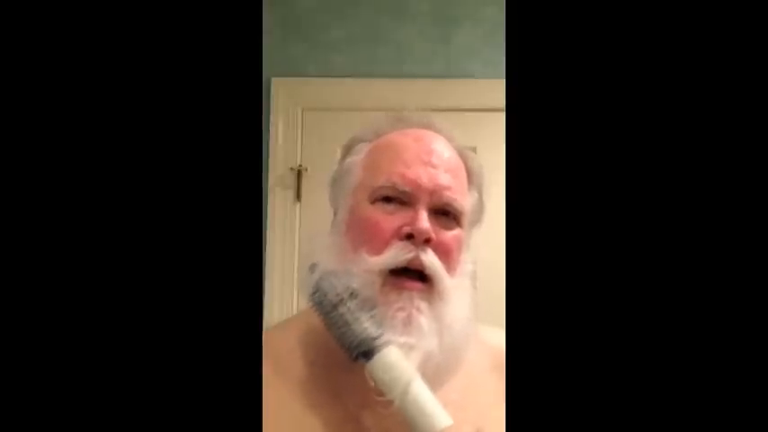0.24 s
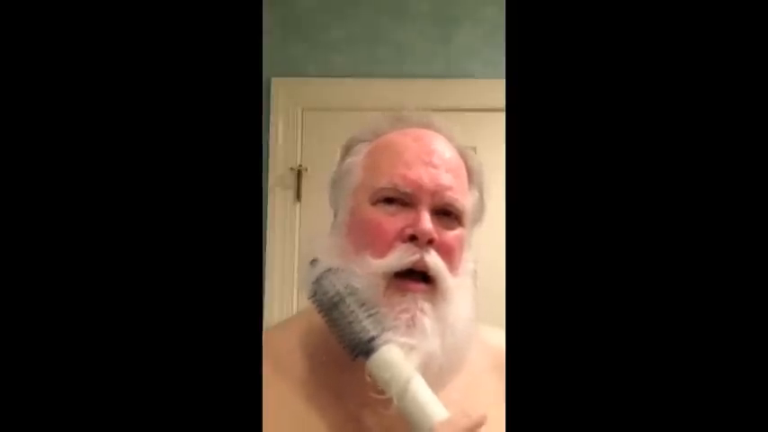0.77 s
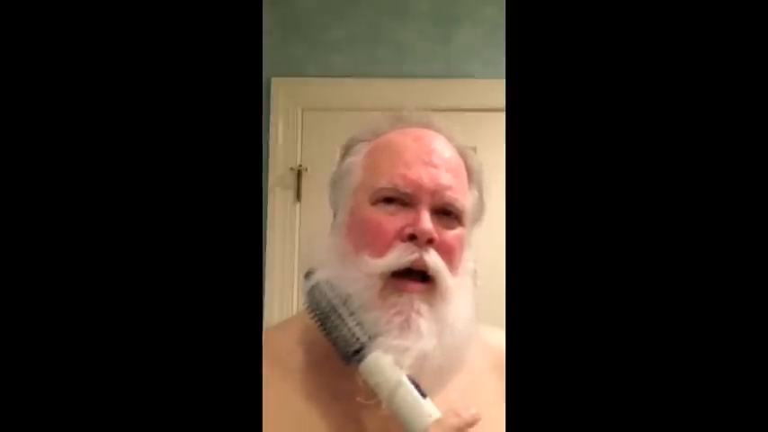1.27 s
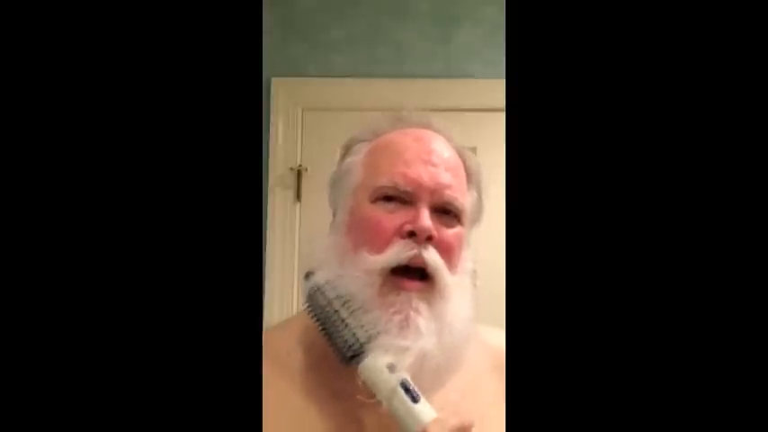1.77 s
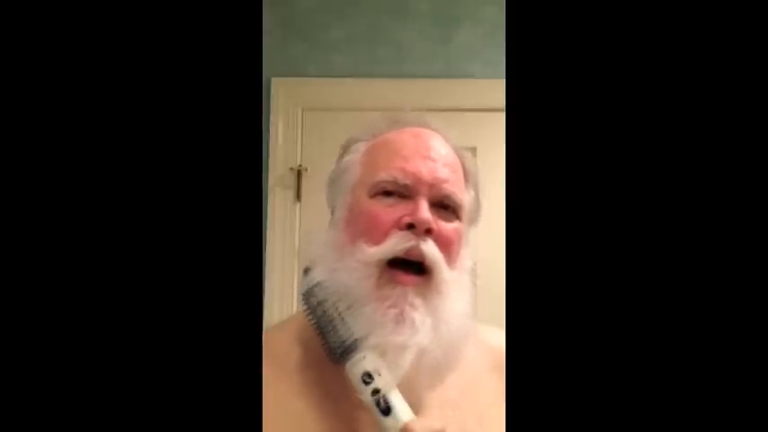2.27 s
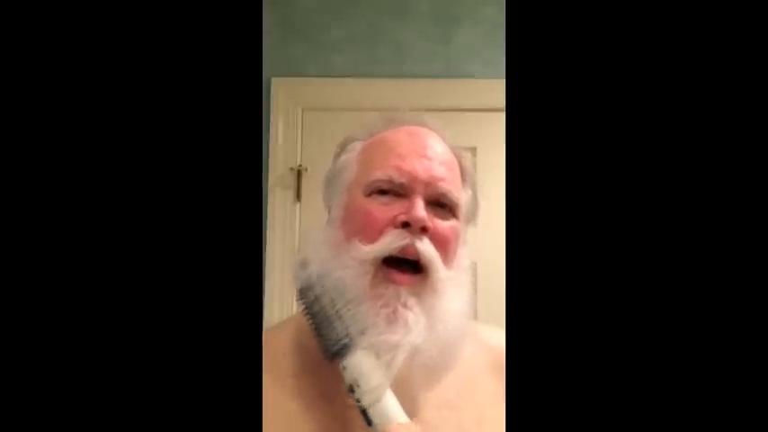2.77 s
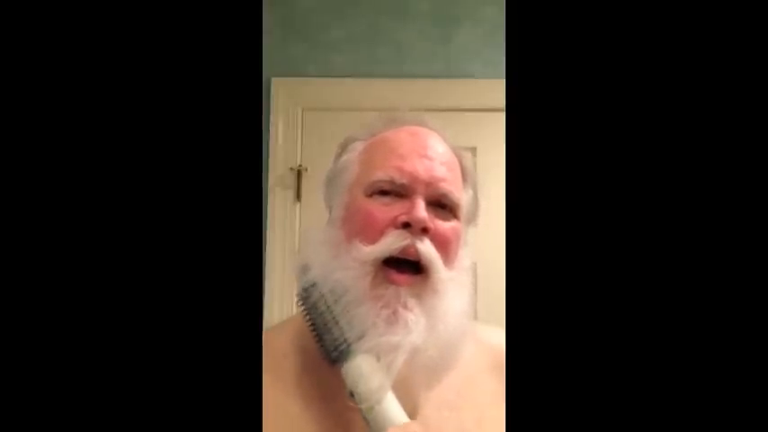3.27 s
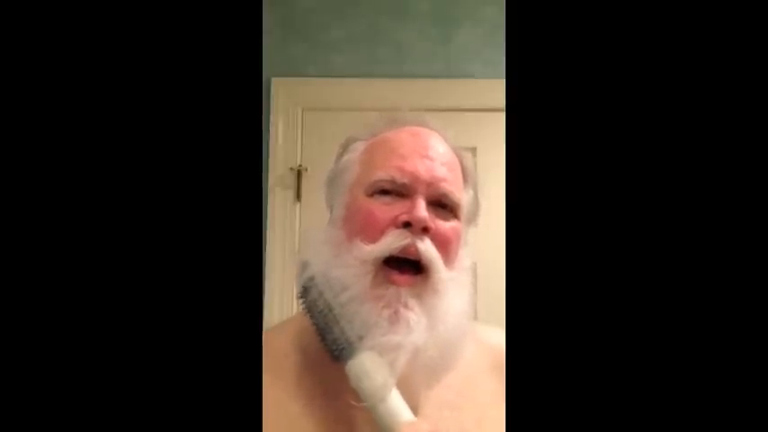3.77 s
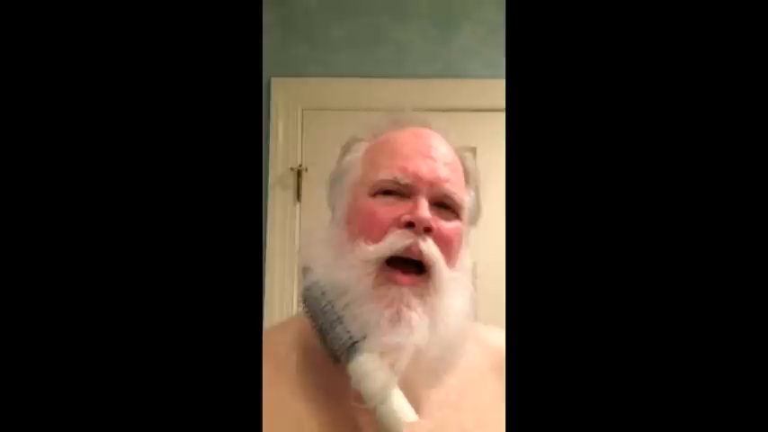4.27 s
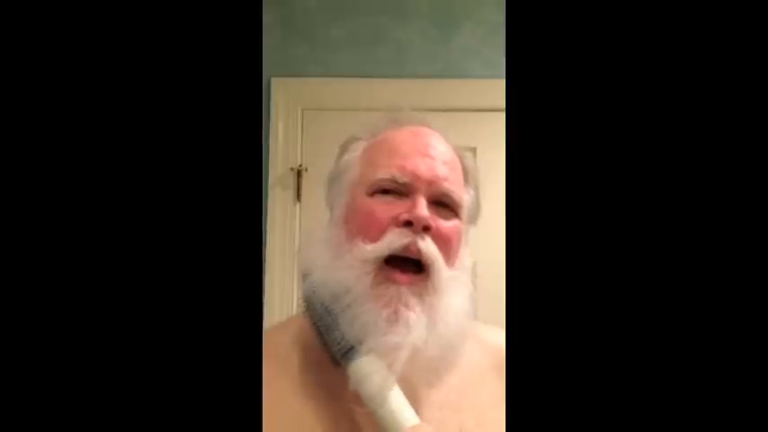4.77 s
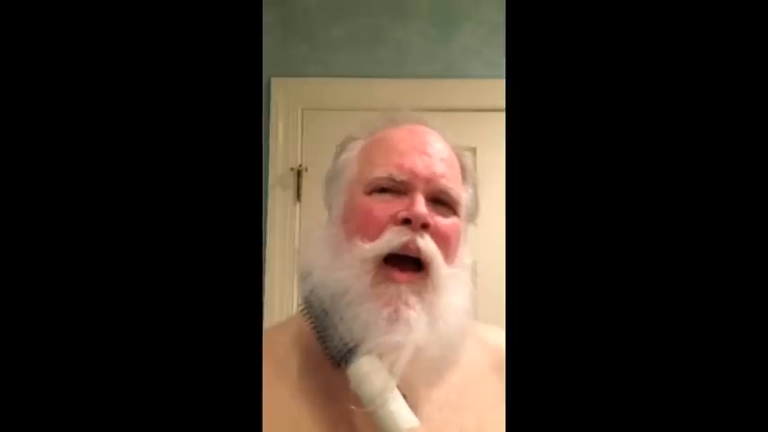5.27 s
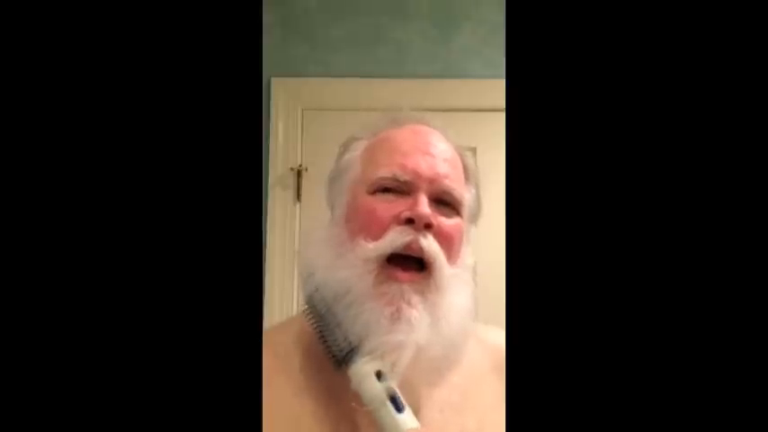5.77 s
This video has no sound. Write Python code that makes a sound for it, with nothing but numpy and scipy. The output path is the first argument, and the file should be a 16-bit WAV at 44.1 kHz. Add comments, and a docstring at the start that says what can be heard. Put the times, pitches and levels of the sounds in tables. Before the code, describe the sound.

Steady blowing air, mostly hiss with a hollow mid roar, and the high electric whine of a small fast fan, heard very close with a short bathroom reverberation. The motor pitch barely moves, but individual tones flicker in and out as the brush turns through hair. The rush is slightly duller around one to two seconds, then opens brighter and fuller, running on to the end.

```python
"""Hot-air brush in a beard

Small bathroom, hard walls: a hot-air styling brush, close to the microphone, is drawn slowly through a beard.
Air rushes out through the barrel: coloured noise in six registers, with a short room tail.
It rings briefly in gaps against the hair: noise through narrow resonances, faded in and out.
The fan motor whines in a stack of shaft orders, each flanked by side tones from the rectified mains.
As the brush turns, the rush changes colour and single tones swell and fade.
"""
import sys
import numpy as np
from scipy import signal
from scipy.fft import rfft, irfft, next_fast_len
from scipy.io import wavfile
from scipy.ndimage import uniform_filter1d, map_coordinates

SR = 44100
rng = np.random.default_rng(int(sys.argv[2]) if len(sys.argv) > 2 else 0)


def store_wav(level_fs):
    """Save 16-bit WAV to argv[1]."""
    pcm = np.round(np.clip(np.atleast_2d(level_fs), -1, 1) * 32767)
    wavfile.write(sys.argv[1], SR, pcm.T.astype(np.int16))


N = 265482

# decay of the bathroom tail: pitch_hz, t60_s
BATHROOM_DECAY = [(150, 0.35), (2000, 0.29), (12000, 0.098)]
# how squarely the air outlets face the microphone: time_s, facing (0 turned away to 1 facing)
OUTLET_FACING = [(0, 0.49), (.9, 0.042), (1.8, .03), (2.3, 0.68), (2.7, 0.36), (3.5, 0.88), (4.7, 0.74),
                 (5.7, 0.43), (6, 0.71)]
# broad spectrum of the rushing air, before each register is levelled: pitch_hz, density_db (per Hz, relative)
AIR_SPECTRUM = [(25, -46), (52, -47), (68, -26), (100, -27.5), (120, -16.5), (300, -13.5), (430, -9),
                (560, -4), (850, -1), (2300, 1), (3100, -6), (4300, -4.5), (7800, -11), (10000, -17),
                (15200, -25)]
# resonances the air excites in room and barrel: pitch_hz, width_hz, lift_db (negative for a dip)
HOLLOW_RESONANCES = [(119.3, 9.7, 5.5), (142, 8.2, 9.5), (219.5, 23, 5), (338, 35, 4), (454, 8.2, -1),
                     (519, 5.5, 8), (590.5, 12.7, 8.5), (633, 11, 2), (687, 8, 3), (704, 17, -10),
                     (880, 57, 7.5), (974, 41, -3), (1340, 26, -4), (1404, 15, 3.5), (1700, 92, 4.5),
                     (1835, 40, -2), (2110, 35, -2), (2504, 67, 4.5), (3590, 94, 4), (5400, 570, -3)]
# brief resonances of the air between barrel and beard: start_s, end_s, pitch_hz, width_hz, level_db (rms)
GAP_RINGS = [ (-.1, 1.4, 480, 60, -52), (.85, 2.6, 1400, 260, -47), (1.05, 1.3, 2480, 200, -43.5),
             (2.12, 2.5, 2430, 300, -42.5), (2.3, 2.47, 860, 110, -41), (2.55, 3.2, 2626, 200, -46),
             (2.6, 3.7, 1730, 160, -46), (3.3, 3.75, 850, 200, -43), (3.52, 3.7, 1400, 160, -44),
             (3.85, 4.08, 5560, 1100, -40), (4.03, 4.36, 824, 180, -44), (4.1, 5.5, 2470, 280.6, -45.5),
             (4.38, 4.7, 1050, 160, -43), (4.7, 5, 573, 69.95, -48.5), (4.902, 6.1, 882, 50.3, -47.5),
             (5.52, 5.54, 2000, 799, -39)]
# fan shaft speed, sagging slightly under load: time_s, speed_hz (turns per second)
SHAFT_SPEED = [(0, 378.0), (0.85, 377.1), (1.25, 377.9), (2.25, 379.2), (2.75, 378.3), (3.9, 378.5),
               (5.45, 377.6), (5.8, 378.3), (6.02, 379.5)]
# shaft whine at orders that are no multiple of three, before the resting trim: pitch_hz, level_db (rms)
SHAFT_WHINE = [(380, -61), (760, -52.5), (1500, -51.5), (2270, -51), (2650, -51), (4500, -56), (8700, -55),
               (11000, -61.5), (12000, -63), (15000, -67)]
# commutator whine at every third order, before the resting trim: pitch_hz, level_db (rms)
COMMUTATOR_WHINE = [(1130, -50.5), (3400, -51), (4540, -50.5), (5670, -55.5), (6800, -50), (7940, -50.5),
                    (9080, -50), (10200, -69), (11350, -55.5), (12480, -60), (13600, -60), (15000, -66)]
# mains side tones that beat hardest and steadily: order (of the shaft), side (-1 or 1), level_db (rms)
MAINS_BEATS = [(3, -1, -57), (3, 1, -53), (6, -1, -52), (6, 1, -52.5)]
# tones that stand out while the brush points their way:
# start_s, end_s, order (of the shaft), side (-1, 0 or 1 ripple), level_db (rms, gate fully open)
AIMED_SWELLS = [ (-.1, .24, 5, 0, -37), (-.1, 0.14, 24, 0, -43.5), (-.1, .36, 21, 0, -44),
                (-.1, 1.2, 3, -1, -47.3), (.06, .15, 12, 0, -39.5), (.1, .55, 3, 1, -46.5),
                (.19, 0.34, 12, 0, -38.5), (.19, 1.68, 33, 0, -54), (.23, .57, 18, 0, -45.5),
                (.24, .42, 5, 0, -37.5), (.38, 0.53, 24, 0, -44), (.42, 0.54, 5, 0, -42.5),
                (.43, .53, 2, 0, -43.5), (.55, 0.71, 5, 0, -39.5), (.55, 0.76, 10, 0, -48),
                (.58, 0.84, 12, 0, -42), (.63, .88, 24, 0, -39.5), (.77, .88, 5, 0, -40),
                (.88, 4.3, 3, 1, -45), (.85, 1.35, 4, 0, -47.5), (.95, 1.3, 18, 0, -47),
                (1.05, 1.24, 10, 0, -45.5), (1.34, 1.7, 12, 0, -42.5), (1.47, 1.66, 10, 0, -44),
                (1.5, 1.65, 24, 0, -46), (1.5, 1.6, 8, -1, -47.5), (1.6, 3, 1, 0, -55.5),
                (1.72, 2.08, 5, 0, -45), (1.79, 1.96, 6, -1, -38.5), (1.8, 1.9, 4, 0, -44),
                (1.95, 2, 21, 0, -42), (1.98, 2.2, 12, 0, -43), (2.05, 2.3, 9, 0, -46),
                (2.05, 2.15, 24, 0, -41.5), (2.12, 2.23, 6, -1, -42.5), (2.15, 2.8, 3, -1, -48),
                (2.2, 2.2, 21, 0, -45), (2.21, 2.35, 2, 0, -40.5), (2.22, 2.4, 24, 0, -47),
                (2.28, 2.5, 6, -1, -35.7), (2.28, 2.55, 4, 0, -45.3), (2.38, 2.54, 21, 0, -42.3),
                (2.45, 2.68, 2, 0, -40), (2.68, 3.27, 2, 0, -41.3), (2.5, 3.3, 3, 0, -46.5),
                (2.65, 3.04, 6, -1, -43.5), (2.65, 3.25, 18, 0, -48), (2.71, 2.74, 24, 0, -40.5),
                (2.72, 3, 10, 0, -43), (2.72, 3.15, 4, 1, -45), (2.88, 3.1, 11, 0, -45),
                (3, 3.65, 10, 0, -46.5), (3, 3.22, 24, 0, -45), (3.05, 3.33, 3, 0, -43.5),
                (3.1, 3.9, 5, 1, -48), (3.15, 3.23, 6, -1, -36), (3.2, 4.1, 15, 0, -48.5),
                (3.22, 3.64, 4, 1, -42), (3.331, 3.48, 21, 0, -43), (3.34, 3.64, 2, 0, -39.5),
                (3.54, 3.67, 2, 0, -42.5), (3.38, 3.66, 6, -1, -40.7), (3.43, 3.4, 4, 0, -43.7),
                (3.57, 3.96, 9, 0, -42), (3.66, 3.78, 24, 0, -43), (3.68, 4.2, 4, 1, -46),
                (3.72, 3.92, 8, -1, -47), (3.84, 4.14, 6, -1, -42.5), (3.85, 4.5, 6, 1, -45),
                (3.89, 4.17, 24, 0, -44), (3.97, 4.6, 2, 0, -46), (4.03, 5.6, 3, -1, -44.5),
                (4.15, 4.5, 9, 0, -44), (4.17, 4.29, 24, 0, -39.5), (4.2, 4.6, 5, 0, -44.5),
                (4.2, 5.9, 21, 0, -49), (4.31, 4.7, 12, 0, -41.5), (4.31, 4.6, 33, 0, -55),
                (4.35, 4.72, 3, 0, -44), (4.38, 4.66, 9, 0, -43.3), (4.5, 6.6, 3, 1, -45.5),
                (4.75, 4.96, 10, 0, -44.5), (4.8, 4.92, 4, 0, -41.5), (4.88, 5.1, 2, 0, -48),
                (4.88, 5.1, 9, 0, -44.5), (4.9, 4.9, 24, 0, -45.5), (4.95, 5.1, 15, 0, -47.5),
                (5.07, 5.1, 10, 0, -41.5), (5.27, 6.8, 10, 1, -49.5), (5.29, 5.5, 10, 0, -43),
                (5.34, 5.4, 24, 0, -44), (5.379, 5.56, 15, 0, -46.5), (5.55, 6.1, 5, 0, -48),
                (5.7, 6.1, 11, 0, -45), (5.76, 6, 6, -1, -41.3), (5.79, 6.2, 24, 0, -43.5)]

RIPPLE_HZ = 120  # rectified mains
SEGMENTS, BLADES, ORDER_COUNT = 3, 5, 40
BLADE_DB, BLADE_OCTAVE_DB = -49.5, -53  # rms, before the resting trim
TOP_HZ = 15300  # upper limit of the microphone


def amp(db):
    """Decibels to gain."""
    return 10 ** (np.asarray(db) / 20)


def unit(x):
    """Scale to rms 1."""
    return x / np.sqrt(np.mean(np.abs(x) ** 2) + 1e-20)


def along(points, hz):
    """Read (pitch_hz, value) points on a log pitch axis."""
    point_hz, values = np.transpose(points)
    return np.interp(np.log(hz + 1), np.log(point_hz + 1), values)


def over_time(points):
    """Read (time_s, value) points at every sample."""
    time_s, values = np.transpose(points)
    return np.interp(np.arange(N) / SR, time_s, values)


def wobble(rate_hz):
    """A smooth random curve through rate_hz random knots a second."""
    coarse = np.linspace(0, N, num=2048)
    knots = rng.standard_normal(size=1024)
    curve = map_coordinates(knots, [coarse * rate_hz / SR], mode="mirror")
    return np.interp(np.arange(N), coarse, curve)


def filtered(x, response):
    """Multiply the spectrum of x by a response of frequency."""
    size = next_fast_len(N + SR // 2)
    spectrum = rfft(x, size) * response(np.fft.rfftfreq(size, 1 / SR))
    return irfft(spectrum, size)[:N]


def opening(t, start, end, fade_s):
    """A gate with straight fades centred on start and end; a short one opens only partly."""
    return np.clip(np.minimum(t - start, end - t) / fade_s + .5, 0, 1)


def room(x, wet_db):
    """Direct sound plus the tail from hard walls, which dies faster in the treble."""
    hz, t, noise = signal.stft(rng.standard_normal(SR // 2), SR, nperseg=256)
    decay = amp(-60 * t / along(BATHROOM_DECAY, hz)[:, None])
    tail = signal.istft(noise * decay, SR, nperseg=256)[1]
    running = np.concatenate([x[-SR:], x])  # the room is already filled with sound
    echo = signal.fftconvolve(running, tail / np.linalg.norm(tail))[SR:SR + N]
    return (x + amp(wet_db) * echo) / np.hypot(1, amp(wet_db))


def patches(x, depth_db):
    """Reflections from the hand and face shift slowly, lifting some pitches and dulling others."""
    spectrum = signal.stft(x, nperseg=1024)[2]
    field = rng.standard_normal(spectrum.shape)
    field = uniform_filter1d(field, size=4, axis=0)  # smooth across pitch
    field = uniform_filter1d(field, size=28, axis=1)  # smooth over time
    return signal.istft(spectrum * amp(depth_db * unit(field)), nperseg=1024)[1][:N]


def air_colour(hz):
    """The broad spectrum of the jet, lifted or dipped at each resonance."""
    lift_db = sum(db / (1 + (2 * (hz - centre) / width) ** 2) for centre, width, db in HOLLOW_RESONANCES)
    return amp(along(AIR_SPECTRUM, hz) + lift_db)


def rush(low_hz, high_hz, flutter_db, wet_db, patchy_db):
    """One register of the air noise, near rms 1, fluttering with the turbulence."""
    def response(hz):
        below_high = 1 / (1 + (hz / high_hz) ** 8)
        above_low = 1 - 1 / (1 + (hz / low_hz) ** 8)
        return air_colour(hz) * np.sqrt(below_high * above_low)

    jet = patches(room(rng.standard_normal(N), wet_db), patchy_db)
    flutter = unit(wobble(2.86) + wobble(9.3))
    return unit(filtered(jet, response)) * amp(flutter_db * flutter)


def outlet(away_db, facing_db):
    """Gain of an air outlet, rising from its turned-away level as it comes to face the microphone."""
    return amp(away_db + over_time(OUTLET_FACING) * (facing_db - away_db))


def airflow():
    """Turbulent air: rumble and duct roar hold their level, the other registers follow the brush's turning."""
    rumble = amp(-46) * rush(low_hz=15, high_hz=595, flutter_db=-0.3, wet_db=-13.5, patchy_db=1.0)
    barrel = outlet(away_db=-42.5, facing_db=-39) * rush(
        low_hz=590, high_hz=1080, flutter_db=-0.04, wet_db=-8.5, patchy_db=2.0)
    duct = amp(-40.0) * rush(low_hz=1150, high_hz=1720, flutter_db=0.14, wet_db=-8.5, patchy_db=1.2)
    grille = outlet(away_db=-40.0, facing_db=-38.5) * rush(
        low_hz=1900, high_hz=3610, flutter_db=1.1, wet_db=-8.5, patchy_db=2.5)
    hiss = outlet(away_db=-35.5, facing_db=-34.0) * rush(  # between bristles and hair
        low_hz=3170, high_hz=9700, flutter_db=0.5, wet_db=-8, patchy_db=2)
    top_hiss = outlet(away_db=-45.0, facing_db=-43.5) * rush(
        low_hz=8400, high_hz=18000, flutter_db=1.8, wet_db=-10, patchy_db=4.0)
    return rumble + barrel + duct + grille + hiss + top_hiss


def hoots(fade_s=.05):
    """Gaps between barrel and beard open for a moment, and the air rings in them."""
    t = np.arange(N) / SR
    out = np.zeros(N)
    for start, end, centre, width, level_db in GAP_RINGS:
        def peak(hz):
            damping = (hz * width) ** 2
            return damping / (damping + (hz ** 2 - centre ** 2) ** 2)

        ring = unit(filtered(rng.standard_normal(N), peak))
        out += amp(level_db) * ring * opening(t, start, end, fade_s)
    return out


def order_db(order, hz):
    """Level of one shaft order, set by the part of the motor that repeats at that rate."""
    if order == BLADES:
        return BLADE_DB
    if order == 2 * BLADES:
        return BLADE_OCTAVE_DB
    return along(SHAFT_WHINE if order % SEGMENTS else COMMUTATOR_WHINE, hz)


def tone(phase, scatter, rate_hz):
    """A line near rms 1: a steady direct part plus reflections that drift as the brush moves."""
    phase = ((phase + rng.uniform(0, 2 * np.pi)) % (2 * np.pi)).astype(np.float32)
    in_phase = (1 + scatter * wobble(rate_hz)) * np.sin(phase)
    quadrature = scatter * wobble(rate_hz) * np.cos(phase)
    return (in_phase + quadrature) / np.sqrt(.5 + scatter ** 2)


def motor():
    """Shaft orders with their mains side tones; a tone aimed at the microphone swells and steadies."""
    whine_db, side_db = .5, -10.5  # resting trim of the orders and of their side tones
    rest_scatter, beat_scatter, aimed_scatter = 0.65, 0.25, 0.12  # drifting reflections against direct sound
    jitter_hz = 0.181  # speed wander, turns per second
    t = np.arange(N) / SR
    speed = over_time(SHAFT_SPEED)
    shaft = 2 * np.pi * np.cumsum(speed + jitter_hz * wobble(14)) / SR
    ripple = 2 * np.pi * RIPPLE_HZ * t
    beats = {(order, side): db for order, side, db in MAINS_BEATS}
    out = np.zeros(N)
    for order in range(1, ORDER_COUNT + 1):
        level_db = order_db(order, order * speed.mean())
        drift_hz = 10 + .4 * order  # short waves fade faster
        for side in (-1, 0, 1):
            trim_db = side_db if side else whine_db
            rest = amp(beats.get((order, side), level_db + trim_db))
            loose = beat_scatter if (order, side) in beats else rest_scatter
            gain, scatter = rest, loose
            for start, end, its_order, its_side, top_db in AIMED_SWELLS:
                if (its_order, its_side) == (order, side):
                    fade_s = 0.018 + .22 / (order + 2) + 0.06 * (end - start)  # low, long swells are gentler
                    gate = opening(t, start, end, fade_s)
                    gain = gain + gate * (amp(top_db) - rest)
                    scatter = scatter + gate * (aimed_scatter - loose)
            out += gain * tone(order * shaft + side * ripple, scatter, drift_hz)
    return out


def scene():
    """Air and motor reach one close microphone, the same in both channels."""
    brush = airflow() + hoots() + motor()
    return np.array([brush, brush])


def record(dry):
    """The microphone keeps nothing above its band limit."""
    return np.array([filtered(channel, lambda hz: hz < TOP_HZ) for channel in dry])


dry = scene()
out = record(dry)
store_wav(out)
```